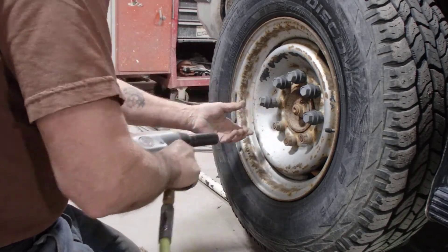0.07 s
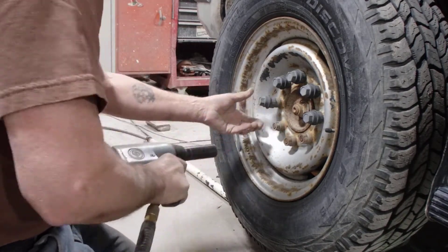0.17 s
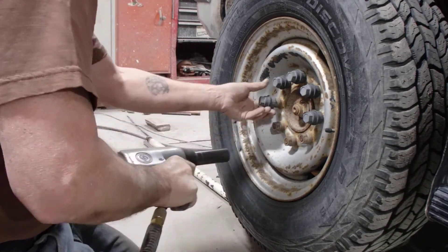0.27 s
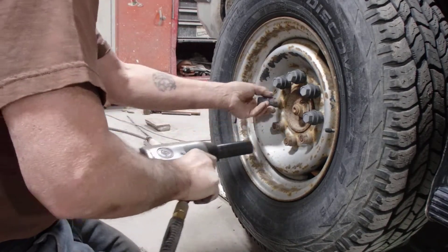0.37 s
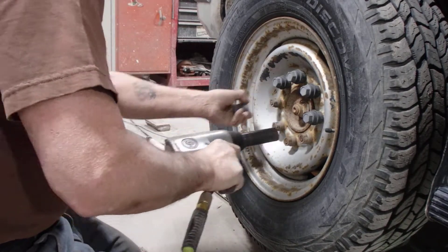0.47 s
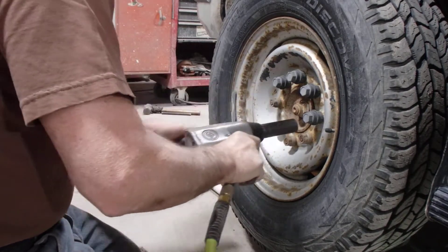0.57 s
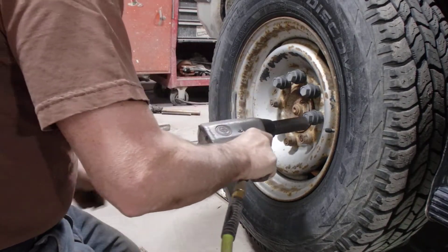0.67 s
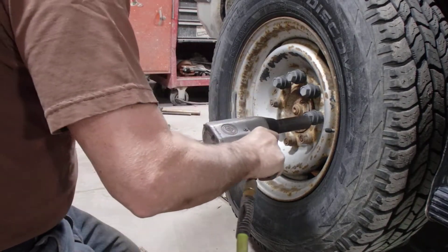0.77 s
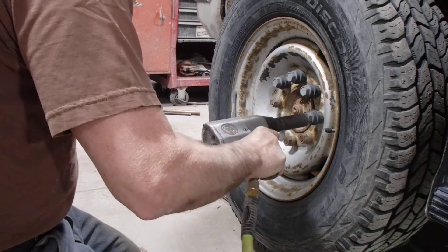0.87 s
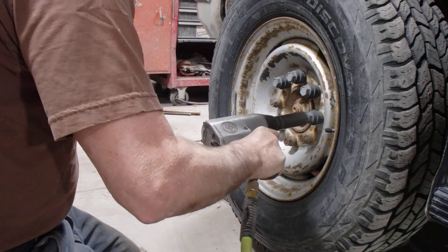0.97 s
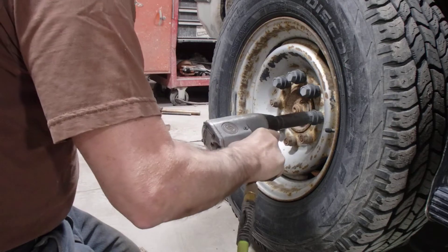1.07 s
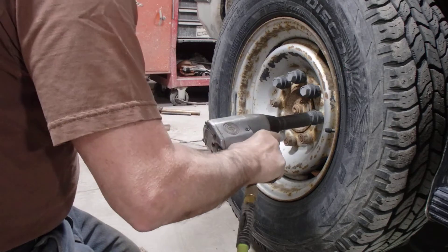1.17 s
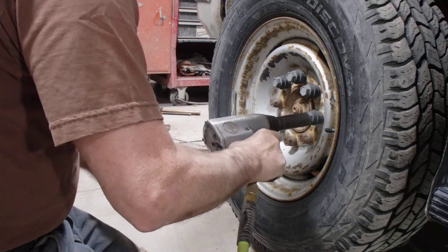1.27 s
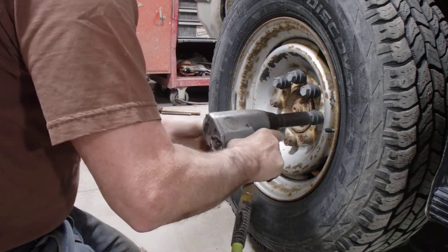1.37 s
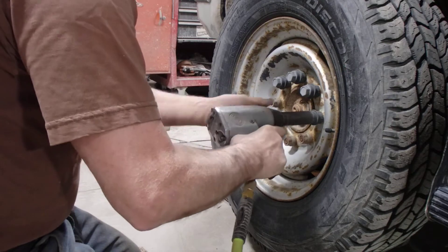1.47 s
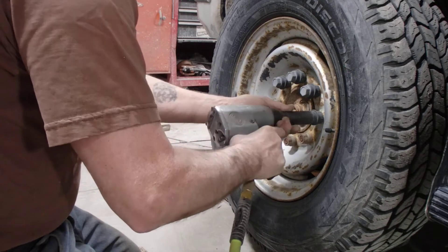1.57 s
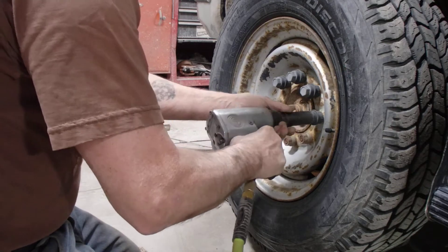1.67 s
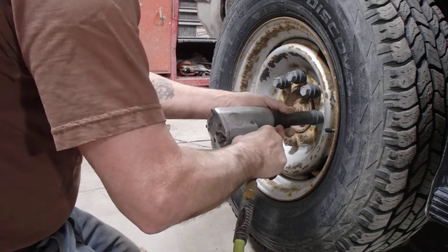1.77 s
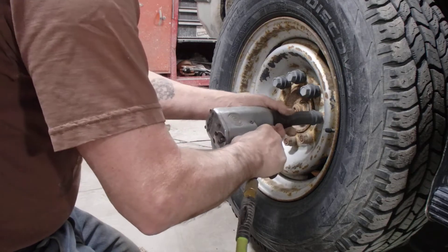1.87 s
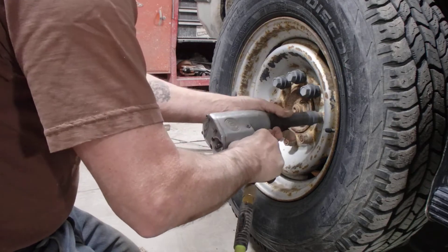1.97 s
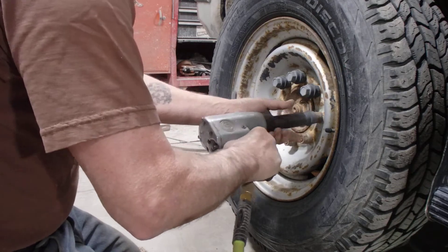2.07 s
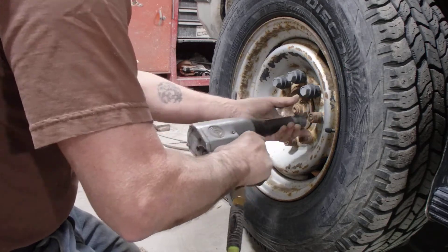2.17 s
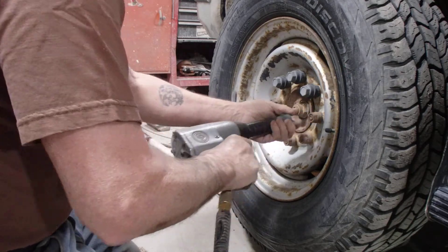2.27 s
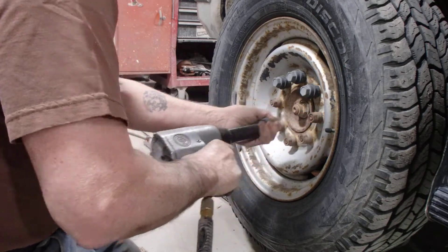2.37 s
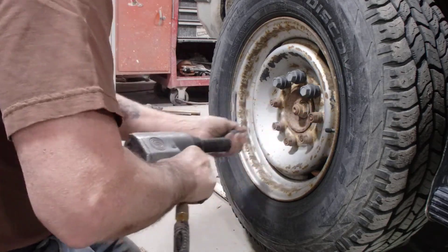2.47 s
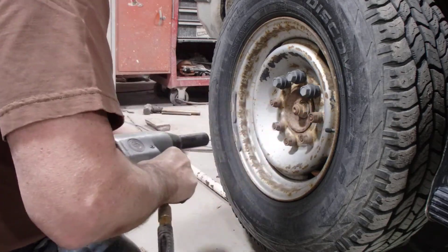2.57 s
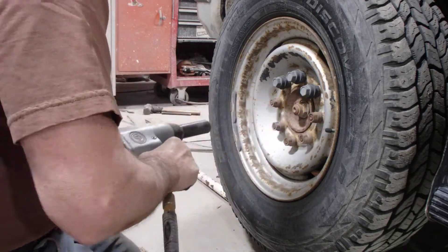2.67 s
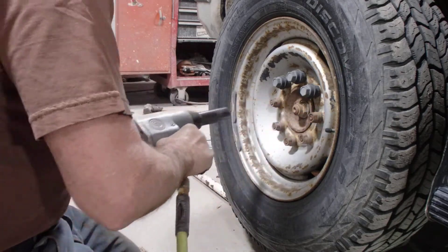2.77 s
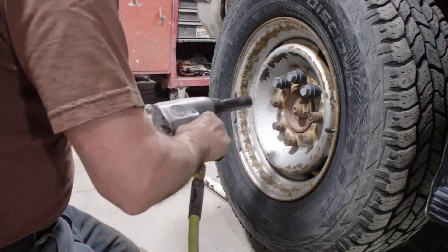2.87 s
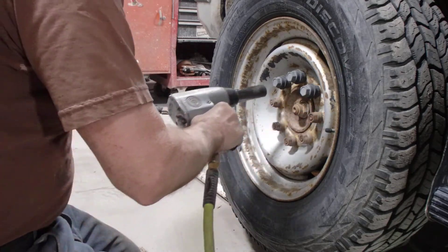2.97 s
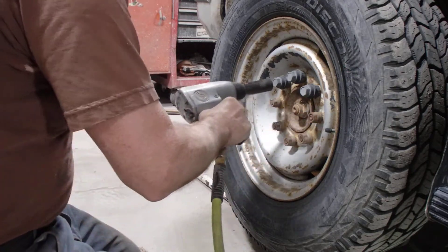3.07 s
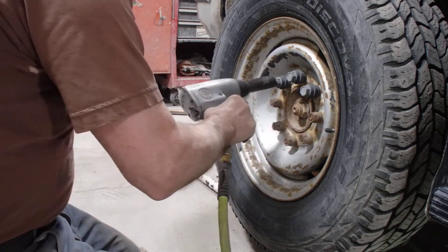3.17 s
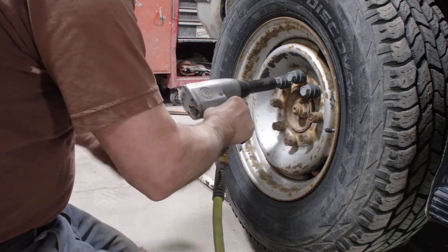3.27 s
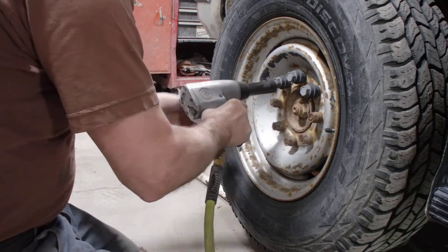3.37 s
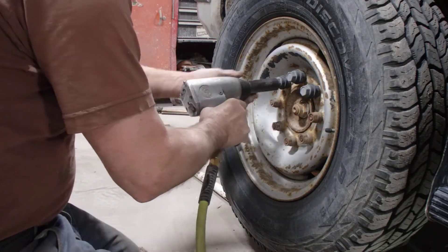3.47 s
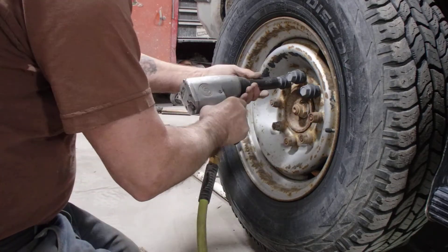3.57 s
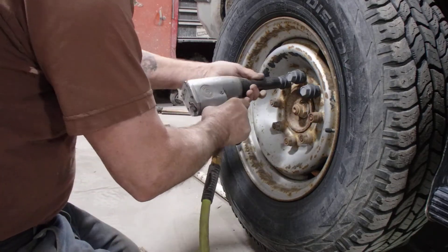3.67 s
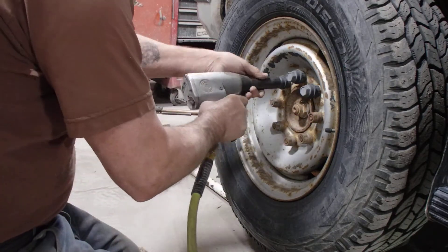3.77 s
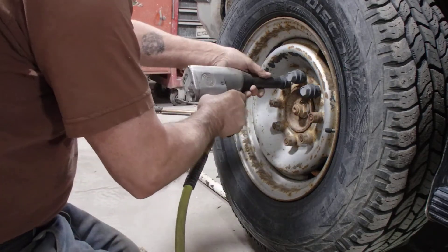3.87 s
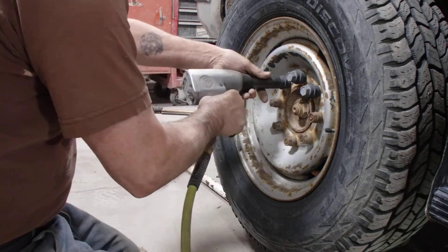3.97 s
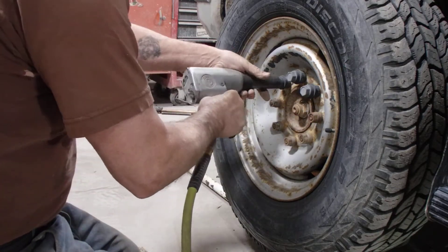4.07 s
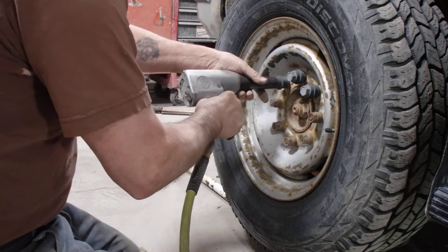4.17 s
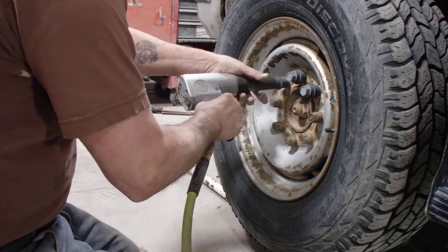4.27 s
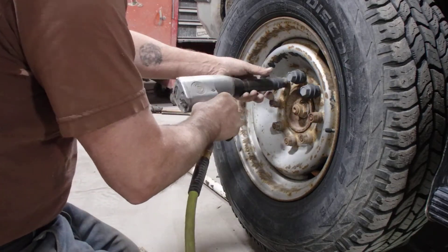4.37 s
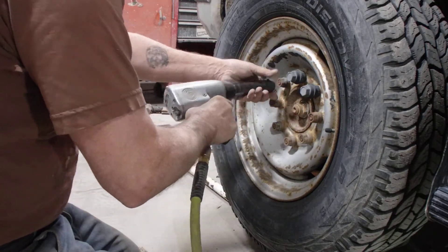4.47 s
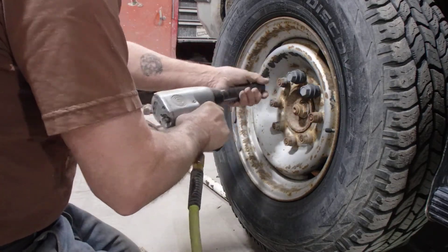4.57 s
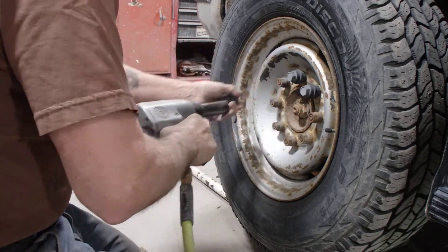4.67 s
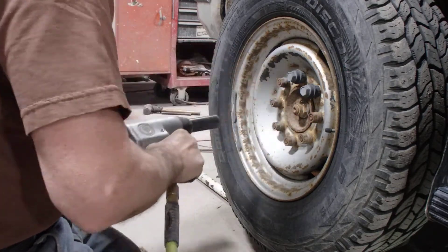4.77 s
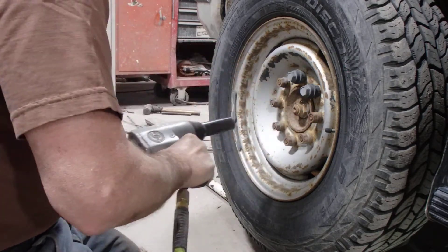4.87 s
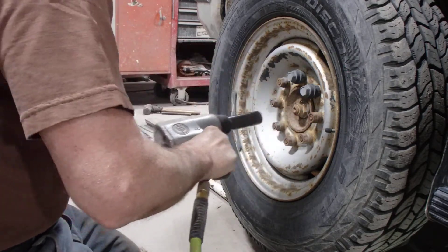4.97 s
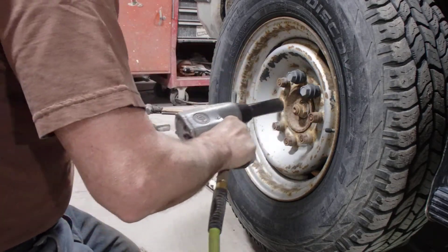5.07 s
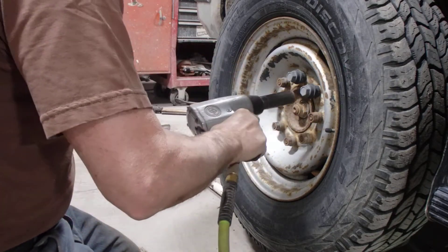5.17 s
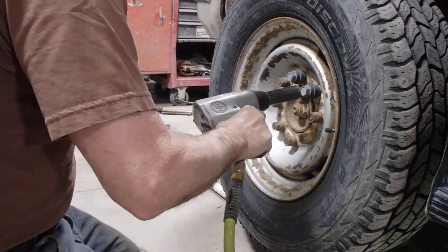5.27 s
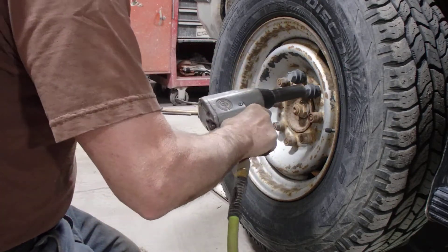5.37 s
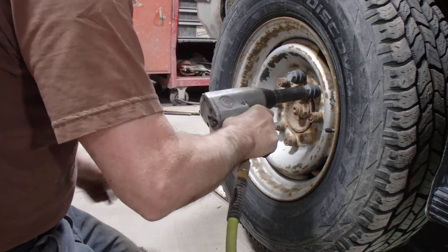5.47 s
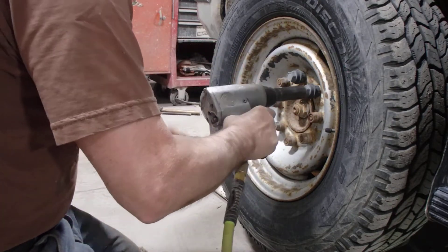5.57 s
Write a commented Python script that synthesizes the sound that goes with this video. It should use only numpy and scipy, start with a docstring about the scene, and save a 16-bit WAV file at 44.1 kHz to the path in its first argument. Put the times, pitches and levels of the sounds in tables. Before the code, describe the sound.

In a garage, a pneumatic wrench rattles and whines through two short bursts, coasting down after each as steel nuts clack and hop on concrete.

```python
"""The vane motor of an air impact wrench coasts down in a garage, and a loose nut clacks on the concrete.
The socket knocks onto a wheel nut, the hammer rattles it loose and the motor whines up in two steps,
its exhaust hissing, and coasts down; nuts drop and hop. The cycle repeats and a last nut lands.
Sources are shaped noise, vane harmonics and fading modes, with an echo of decaying diffuse noise.
A limiter, held down at first, ducks under each burst and lets the room noise swell back slowly."""
import sys
import numpy as np
from scipy import signal
from scipy.fft import rfft, irfft
from scipy.io import wavfile
from scipy.ndimage import uniform_filter1d

SR = 44100
rng = np.random.default_rng(int(sys.argv[2]) if len(sys.argv) > 2 else 0)


def file_out(sig):
    """Save sig as 16-bit WAV at sys.argv[1]."""
    # one column per channel
    cols = np.atleast_2d(sig).T
    # limit, then scale
    lim = np.clip(cols, -1, 1)
    pcm = np.round(lim * 32767).astype(np.int16)
    wavfile.write(sys.argv[1], SR, pcm)


N = 247401
T = np.arange(N) / SR  # s
HIT_T = T[:SR // 4]  # time axis of one hit, s
HZ = np.fft.rfftfreq(2 * N, 1 / SR)

# Spectrum of the ventilation noise. Each row: frequency in Hz, level in dB.
VENTILATION_SPECTRUM = [(25, -25), (70, -18.5), (100, -3.5), (170, -3.5), (210, -5.5), (260, 0.5),
                        (300, -4), (370, 6), (500, -7), (1000, -10.5), (2200, -17), (4000, -13.5),
                        (6000, -23), (15000, -29.5)]
# Reverberation time of the garage. Each row: frequency in Hz, 60 dB decay time in s.
ROOM_DECAY = [(150, 0.2), (400, 0.63), (1500, 0.59), (4000, 0.59), (10000, 0.33)]

# Dropped nuts reach the floor. Each row: start in seconds, clack in dB, pitch of the hollow in Hz,
# hollow in dB, clink in dB; TUMBLE shifts all three levels.
LANDINGS = [(1.2587, -11.5, 1740, -11, -20), (1.277, -12.5, 1900, -15, -14), (3.27, -10, 2320, -13, -27),
            (3.555, -27.5, 2220, -21.5, -36), (3.7862, -11.5, 2260, -15.5, -29),
            (5.4708, -13, 1900, -10, -17.5)]
# Strikes of one landing, from corner to face to rebound. Each row: delay in seconds, level shift in dB.
TUMBLE = [(0, -1.5), (.0033, -1), (.016, -8)]
# Light hops as a nut rolls away. Each row: start in seconds, clack in dB, pitch of the hollow in Hz.
HOPS = [(3.389, -23, 2000), (3.435, -23, 1900), (3.61, -23, 2150), (3.866, -29, 2250), (3.909, -22, 2084),
        (3.949, -33, 2200), (5.5705, -18.5, 2100)]
# Spectrum of a nut's impact on concrete. Each row: frequency in Hz, level in dB.
CLACK_SPECTRUM = [(40, -54.5), (200, -32.5), (600, -27), (1000, -23), (1500, -9.5), (2000, -1.5),
                  (2700, -1.5), (3700, 0), (4550, 0), (5800, -11), (7000, -10.5), (8200, -19.5),
                  (10400, -14), (12500, -17.5), (15000, -17.5)]
# Modes of a nut's own steel. Each row: frequency in Hz, level in dB, 60 dB decay time in s.
NUT_MODES = [(6876, -1, 0.0043), (10100, 0.5, 0.0069), (10700, 0, .005)]

# The free nut chinks in the slowing socket. Each row: start in seconds, level in dB.
CHINKS = [(.051, -6), (.565, -33), (2.408, 7), (2.474, -5), (4.606, 3.5), (4.6986, 4), (4.759, -7)]
# The socket is seated on the next nut. Each row: start in seconds, level in dB, contact width in ms.
KNOCKS = [(1.6416, -17, 11), (3.67, -20.5, 3), (3.707, -29, 1.7), (3.996, -28, 3.5)]
# Modes of socket and anvil, damped by the hand and the nut.
# Each row: frequency in Hz, level in dB, 60 dB decay time in s.
SOCKET_MODES = [(1450, -24.5, 0.021), (2094, -11.5, .02), (2850, -8, 0.0083), (3026, 3, .025),
                (3630, 0.5, 0.038), (3600, 3.5, .025), (4117, 1, .025), (4190, 2, 0.01), (4550, 0.5, 0.04),
                (5740, -9, 0.027), (9610, -5, 0.053)]
# Spectrum of a steel contact before its tilt. Each row: frequency in Hz, level in dB.
CRACK_SPECTRUM = [(40, -57), (300, -22), (900, -22), (1700, -5.5), (2600, -2), (3400, -1.5), (4400, 1.5),
                  (5600, 0), (8000, -4.5), (15000, -13)]

# Single hammer blows when the turning nut catches.
# Each row: start in seconds, level in dB, contact width in ms, ring in dB relative to the crack.
BLOWS = [(1.9515, 16, 2, -5), (1.9878, 21, 1.8, -3), (2.0265, 21, 3.5, -7.5), (2.0715, 20.5, 4, -20),
         (2.1095, 10, 2.8, -12), (2.157, 16.5, 3.3, -12), (2.2128, 20.5, 3.4, -3), (2.297, 9, 1, -10),
         (4.168, 1.5, 3.5, -16), (4.1993, 19, 2, -7.5), (4.2348, 20.5, 5, -9.5), (4.2762, 26, 1.4, -2),
         (4.3194, 20.5, 2.5, -6.5), (4.3515, 15, 2.4, -6), (4.3996, 20, 4.2, -12), (4.453, 22, 4.5, -7.5),
         (4.5125, 19.5, 4.5, -3)]
# Fast hammering that breaks a nut loose.
# Each row: start in seconds, length in s, level at the end in dB, ring in dB relative to the crack.
HAMMERING = [(1.92, .027, 11, 4.5), (4.183, .014, 10, -8)]
HAMMER_HZ, HAMMER_SWELL_DB_PER_S, HAMMER_CONTACT_MS = 180, 340, 2.4

# Pulls of the trigger, the first a blip just before the sound begins.
# Each row: pressed in seconds, free to spin in seconds, released in seconds, level in dB.
TRIGGER_PULLS = [(-.08, -.026, -.026, 1.5), (1.915, 2.108, 2.213, .5), (4.161, 4.348, 4.479, -.3)]
# Spectrum of the exhaust. Each row: frequency in Hz, level in dB.
EXHAUST_SPECTRUM = [(50, -47), (120, -41.5), (300, -23.5), (560, -22), (800, -18), (1500, -12.5),
                    (2600, -7), (3800, 1), (4500, 1), (5600, -2), (8000, -3.5), (10000, -7.5),
                    (15000, -17.5)]
# Spectrum of the vane tone before its tilt. Each row: frequency in Hz, level in dB.
VANE_SPECTRUM = [(80, -22), (180, -3.5), (270, -3), (370, 0), (450, -13.5), (560, -13), (780, -6.5),
                 (1050, -10), (1300, -5), (1520, -3.5), (1800, -11.5), (3000, -10.5), (5000, -10.5)]
# Vane rate at the first kick, while the nut is in the thread, and running free
KICK_HZ, LOADED_HZ, FREE_HZ = 138, 358, 535
SPIN_UP_HZ_PER_S, COAST_S = 1680, .19  # steady gain under air; time constant of the run-down
VALVE_OPEN_S, VALVE_CLOSE_S = .014, .019  # time constants of the air flow
EXHAUST_DB, EXHAUST_DB_PER_OCTAVE = 5.5, 4.5  # valve open; a faster motor passes more air
PUMPED_DB, PUMPED_DB_PER_OCTAVE = -12, 9  # air that the spinning vanes push out by themselves
TONE_DB, TONE_DB_PER_OCTAVE = -2, 20  # vane tone while coasting, and its fall at low speed
TONE_DRIVEN_DB, TONE_SWELL_S = -5.5, .085  # vane tone under air; it builds as the vanes seal
GRUNT_DB, GRUNT_AT_S, GRUNT_WIDTH_S = -11.5, .038, .017  # the motor strains at the tight nut
DRIVEN_TILT_DB, COAST_TILT_DB = .7, -1.2  # per octave of harmonics: puffs are sharper under air
FULL_VOICE_HZ = 380  # above this vane rate, tone and air grow no louder

# Responses of the two microphone ports. Each row: frequency in Hz, level in dB.
LEFT_PORT = [(60, -2.5), (2000, 1), (4200, 2), (4700, -4), (5100, -18), (5600, 1), (6200, -3), (7000, -5.5),
             (8000, -8), (9000, -0.5), (10200, -2.5), (12000, -9), (15000, -19.5)]
RIGHT_PORT = [(60, -2.5), (2000, 1), (4200, 1), (4700, -0.5), (5100, -7.5), (5600, -21), (6200, -16.5),
              (7000, -13.5), (8000, -21.5), (9000, -17.5), (10200, -15), (12000, -8.5), (15000, -12.5)]
# Phase by which the left port leads. Each row: frequency in Hz, lead in radians.
PORT_LEAD = [(1500, 0), (3500, .3), (4500, .15), (4900, 1), (5400, 2.8), (6100, -.6), (8000, .1),
             (10200, -2.2), (13000, -2.4), (15000, -1.3)]
TOP_HZ = 15600  # upper edge of the pass band


def undb(db):
    """Amplitude gain is ten to the power of decibels over twenty."""
    return 10 ** (np.asarray(db) / 20)


def unit(x):
    """Normalisation: scale a signal to rms 1."""
    return x / np.sqrt(np.mean(x ** 2))


def along(points, hz):
    """Interpolation of (Hz, value) points on a logarithmic frequency axis."""
    f, value = np.transpose(points)
    return np.interp(np.log(hz + 1), np.log(f), value)


def colour(x, points):
    """Minimum-phase filtering: folding the cepstrum makes a (Hz, dB) response causal."""
    n = 2 * x.shape[-1]
    log_gain = np.log(undb(along(points, np.fft.rfftfreq(n, 1 / SR))))
    cepstrum = irfft(log_gain)
    cepstrum[1:n // 2] *= 2
    cepstrum[n // 2 + 1:] = 0
    response = np.exp(rfft(cepstrum))
    return irfft(rfft(x, n) * response)[..., :n // 2]


def diffuse(size, apart_hz=5600, slope=2.9):
    """Diffuse-field coherence: noise alike at both ports in the bass, unrelated in the treble."""
    mid, side = rfft(rng.standard_normal((2, size)))
    share = np.minimum(np.fft.rfftfreq(size, 1 / SR) / apart_hz, 1) ** slope
    opposed_side = share * side * np.array([[1], [-1]])
    return irfft((mid + opposed_side) / np.sqrt(1 + share ** 2), size)


def hit_level(x, db):
    """Impact energy: a hit is given the energy of 4 ms at this rms level."""
    return x * undb(db) / np.sqrt(np.sum(x ** 2) / (.004 * SR))


def ring(hz, t60, sag=0):
    """Damped mode: exponential decay, its pitch falling by the share sag as it dies away."""
    rise = 1 - np.exp(-HIT_T / .0003)
    pitch = hz * (1 + sag * (np.exp(-4 * HIT_T / t60) - 1))
    phase = 2 * np.pi * np.cumsum(pitch) / SR
    return rise * np.cos(phase) * np.exp(-np.log(1000) * HIT_T / t60)


def modes(table, scatter_db=3, detune=0.0034):
    """Modal superposition: each stroke excites the modes in different proportion."""
    total = 0
    for hz, db, t60 in table:
        level_draw, pitch_draw, sign_draw = rng.standard_normal(3)
        gain = np.sign(sign_draw) * undb(db + scatter_db * level_draw)
        total = total + gain * ring(hz * (1 + detune * pitch_draw), t60)
    return total


def add(track, s, sound):
    """Linear superposition: mix a sound into the track at time s."""
    start = max(int(s * SR), 0)
    track[start:start + len(sound)] += sound[:N - start]


def ambience(level_db=-38.0):
    """Stationary diffuse noise: steady ventilation fills the garage."""
    return undb(level_db) * unit(colour(diffuse(N), VENTILATION_SPECTRUM))


def room(x, wet_db, early_db, early_s=0.018):
    """Reverberation: direct sound, dense near reflections and a tail whose decay depends on frequency."""
    t, hz = T[:SR], np.fft.rfftfreq(SR, 1 / SR)
    noise, tail = rfft(diffuse(SR)), 0
    centres, t60s = np.transpose(ROOM_DECAY)
    for band, t60 in zip(np.eye(len(centres)), t60s):
        band_gain = along(np.c_[centres, band], hz)
        tail = tail + irfft(noise * band_gain) * np.exp(-np.log(1000) * t / t60)
    echo = tail * (1 + undb(early_db) * np.exp(-t / early_s)) * (t > .004)
    echo *= undb(wet_db) / np.sqrt(np.sum(echo ** 2) / 2)
    return x + signal.fftconvolve(x[None], echo, axes=1)[:, :N]


def nut_strike(clack_db, hz, hollow_db, clink_db, clack_s=0.0013, detune=.035):
    """Impact and resonance: concrete clack, steel clink, and a threaded hollow's tock sagging in pitch."""
    clack = colour(rng.standard_normal(len(HIT_T)) * np.exp(-HIT_T / clack_s), CLACK_SPECTRUM)
    pitch = hz * (1 + detune * rng.standard_normal())
    hollow = ring(pitch, .02, sag=.08)
    clink = modes(NUT_MODES)
    return hit_level(clack, clack_db) + hit_level(hollow, hollow_db) + hit_level(clink, clink_db)


def nuts(hop_hollow_db=0, hop_clink_db=-39):
    """Repeated impact: a nut lands with a quick tumble; light hops are single strikes."""
    out = np.zeros(N)
    for s, clack_db, hz, hollow_db, clink_db in LANDINGS:
        for delay, db in TUMBLE:
            add(out, s + delay, nut_strike(clack_db + db, hz, hollow_db + db, clink_db + db))
    for s, clack_db, hz in HOPS:
        add(out, s, nut_strike(clack_db, hz, clack_db + hop_hollow_db, hop_clink_db))
    return out


def blow(db, contact_ms, ring_db, tilt_db_per_octave):
    """Contact and free vibration: milliseconds of grinding noise, with a brief ring of the socket."""
    contact = np.exp(-(HIT_T * 1000 / contact_ms) ** 2 / 2)
    spectrum = [(hz, level + tilt_db_per_octave * np.log2(hz)) for hz, level in CRACK_SPECTRUM]
    crack = colour(rng.standard_normal(len(HIT_T)) * contact, spectrum)
    return hit_level(hit_level(crack, 0) + hit_level(modes(SOCKET_MODES), ring_db), db)


def socket():
    """Contact spectra: bright chinks of a free nut in the socket, duller knocks of seating on the next."""
    out = np.zeros(N)
    for s, db in CHINKS:
        add(out, s, blow(db, contact_ms=2.4, ring_db=-13, tilt_db_per_octave=6))
    for s, db, ms in KNOCKS:
        add(out, s, blow(db, ms, ring_db=-10.5, tilt_db_per_octave=-4.5))
    return out


def hammer(jitter_s=.0005, scatter_db=1.5):
    """Impulse trains: a swelling rattle breaks the nut loose; single blows sound when it catches."""
    out = np.zeros(N)
    for s, db, ms, ring_db in BLOWS:
        add(out, s, blow(db, ms, ring_db, tilt_db_per_octave=-.5))
    for s, length, db, ring_db in HAMMERING:
        for since in np.arange(0, length, 1 / HAMMER_HZ):
            swell_db = -HAMMER_SWELL_DB_PER_S * (length - since)
            level_db = db + swell_db + scatter_db * rng.standard_normal()
            strike = blow(level_db, HAMMER_CONTACT_MS, ring_db, tilt_db_per_octave=3.2)
            add(out, s + since + jitter_s * rng.standard_normal(), strike)
    return out


def vane_rate(pressed, freed, released):
    """Rotor dynamics: speed rises to the thread's limit, again once the nut is free, then decays."""
    driven_s = np.minimum(T, released)
    in_thread = np.minimum(KICK_HZ + SPIN_UP_HZ_PER_S * np.maximum(driven_s - pressed, 0), LOADED_HZ)
    hz = np.minimum(in_thread + SPIN_UP_HZ_PER_S * np.maximum(driven_s - freed, 0), FREE_HZ)
    return hz * np.exp(-(T - driven_s) / COAST_S)


def motor(wobble=.032, coast_wobble=.022, chop=0.65, flutter_db=0.6, shake=0.28):
    """Periodic puffs: each vane's puff feeds shaky harmonics and chops the exhaust hiss at the same rate."""
    out, hiss = np.zeros(N), unit(colour(rng.standard_normal(N), EXHAUST_SPECTRUM))
    slow = signal.butter(2, 90, fs=SR, output="sos")
    pitch_unrest, air_unrest, tone_unrest = unit(signal.sosfilt(slow, rng.standard_normal((3, N))))
    offsets = rng.uniform(0, 2 * np.pi, size=12)  # starting phases of the harmonics
    for pressed, freed, released, db in TRIGGER_PULLS:
        on = (T >= pressed) & (T <= released + 1)
        hz = vane_rate(pressed, freed, released)[on]
        since = T[on] - pressed
        opening = 1 - np.exp(-since / VALVE_OPEN_S)
        drive = np.exp(-np.maximum(T[on] - released, 0) / VALVE_CLOSE_S)
        coast = 1 - drive
        octaves = np.log2(np.minimum(hz / FULL_VOICE_HZ, 1))

        exhaust = undb(EXHAUST_DB + EXHAUST_DB_PER_OCTAVE * octaves) * drive
        air = exhaust + undb(PUMPED_DB + PUMPED_DB_PER_OCTAVE * octaves)

        sealed = (1 - np.exp(-since / TONE_SWELL_S)) ** 2
        grunt = undb(GRUNT_DB) * np.exp(-((since - GRUNT_AT_S) / GRUNT_WIDTH_S) ** 2)
        driven_voice = (undb(TONE_DRIVEN_DB) * sealed + grunt) * drive
        voice = driven_voice + undb(TONE_DB + TONE_DB_PER_OCTAVE * octaves) * coast

        wobbling = (wobble * drive + coast_wobble * coast) * pitch_unrest[on]
        phase = 2 * np.pi * np.cumsum(hz * (1 + wobbling)) / SR
        tilt_db = DRIVEN_TILT_DB * drive + COAST_TILT_DB * coast
        tone = 0
        for k, offset in enumerate(offsets, 1):
            gain = undb(along(VANE_SPECTRUM, k * hz) + tilt_db * np.log2(k))
            tone = tone + gain * np.sin(k * phase + offset)
        gas = hiss[on] * (1 + chop * np.cos(phase)) * undb(flutter_db * air_unrest[on])
        shaky_tone = tone * (1 + shake * tone_unrest[on])
        out[on] += undb(db) * opening * (air * gas + voice * shaky_tone)
    return out


def scene():
    """Direct-to-reverberant balance: the close wrench is drier, the fallen nuts more reverberant."""
    floor = room(nuts(), wet_db=-1.8, early_db=-1.5)
    steel = room(hammer() + socket(), wet_db=-8.5, early_db=2)
    vanes = room(motor(), wet_db=-6, early_db=1)
    return ambience() + floor + steel + vanes


def limiter(x, ceiling_db=-6.8, release_db_per_s=11.5, held_db=28):
    """Peak-hold gain control: ducks at once and recovers slowly, starting at least held_db down."""
    power = uniform_filter1d(np.mean(x ** 2, axis=0), size=120)
    over = np.maximum(10 * np.log10(np.abs(power) + 1e-12) - ceiling_db, 0)
    recovery = release_db_per_s * T
    duck = np.maximum(np.maximum.accumulate(over + recovery), held_db) - recovery
    return x * undb(-uniform_filter1d(duck, size=44))


def record(dry, hiss_db=-51):
    """Transduction: two resonant ports, preamp hiss, limiter, clipping and a steep low-pass."""
    left = undb(along(LEFT_PORT, HZ))
    right = undb(along(RIGHT_PORT, HZ)) * np.exp(-1j * along(PORT_LEAD, HZ))
    at_ports = irfft(rfft(dry, 2 * N) * np.array([left, right]))[:, :N]
    heard = at_ports + undb(hiss_db) * rng.standard_normal((2, N))
    top_cut = signal.ellip(10, .2, 80, TOP_HZ, fs=SR, output="sos")
    return signal.sosfilt(top_cut, np.clip(limiter(heard), -1, 1))


dry = scene()
out = record(dry)
file_out(out)
```